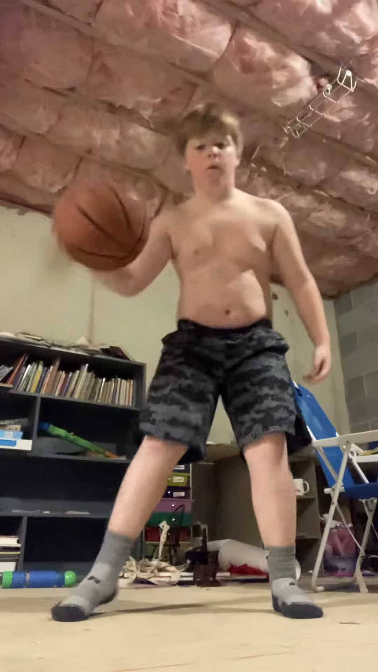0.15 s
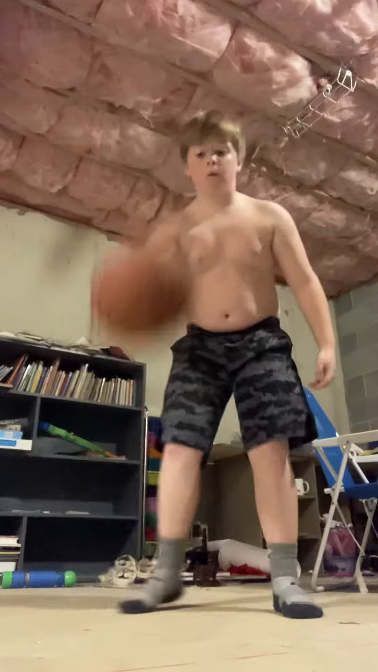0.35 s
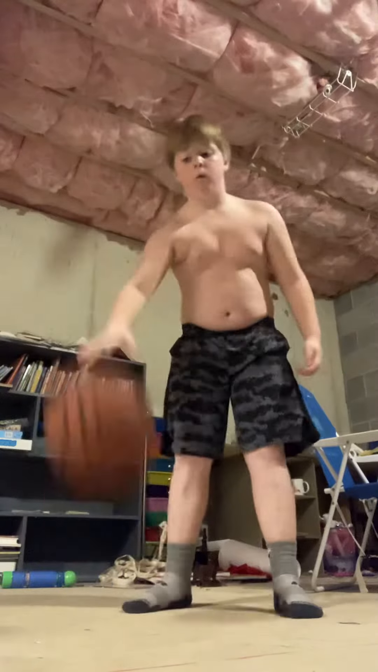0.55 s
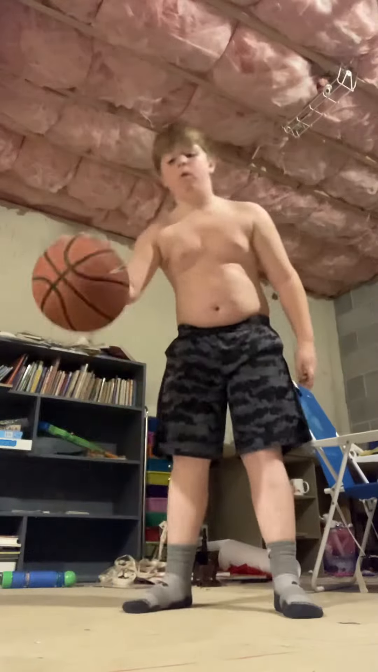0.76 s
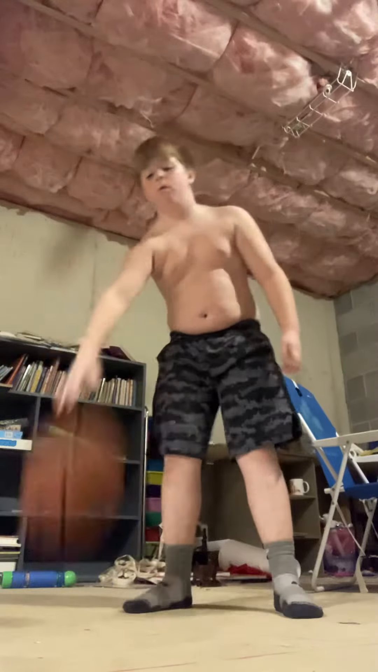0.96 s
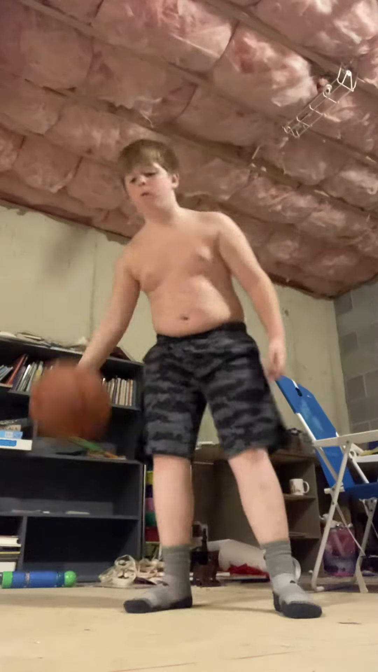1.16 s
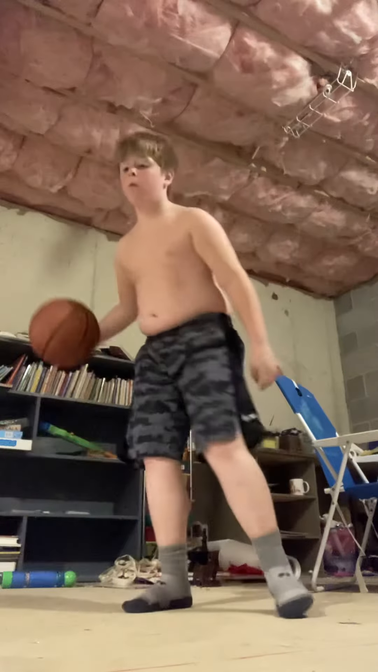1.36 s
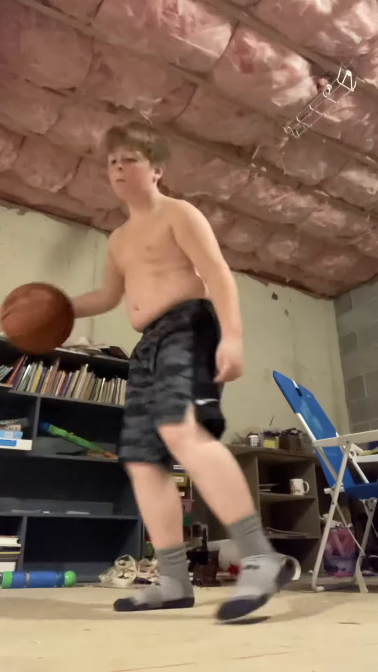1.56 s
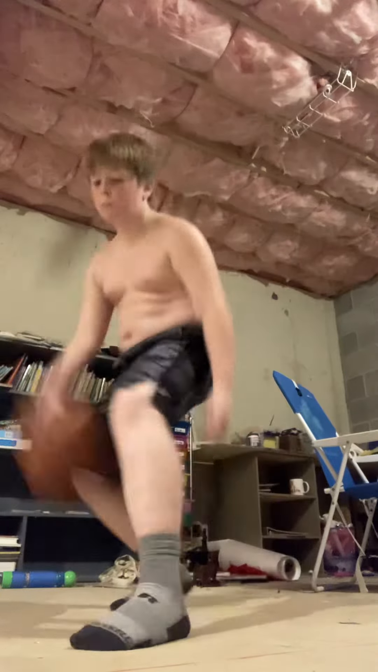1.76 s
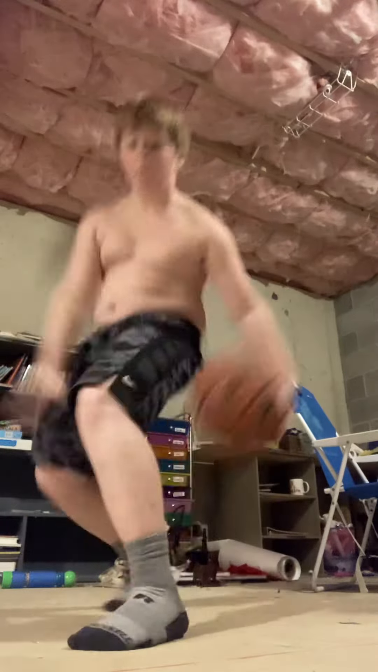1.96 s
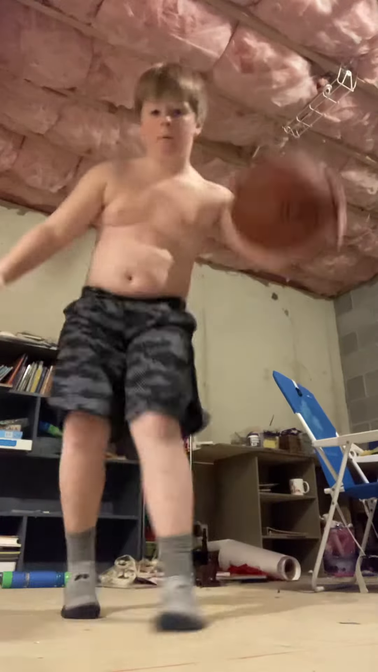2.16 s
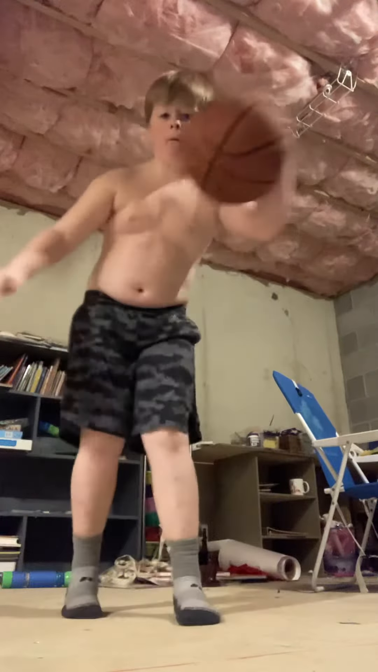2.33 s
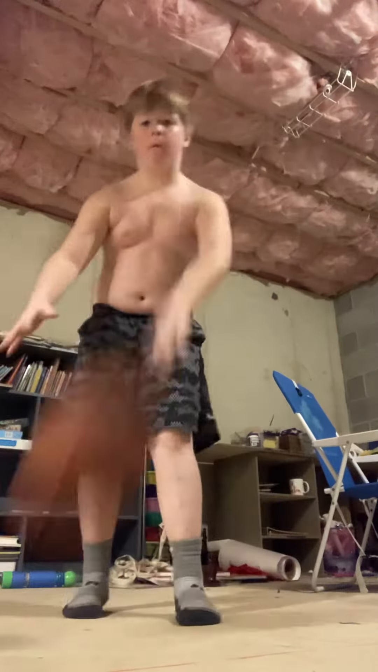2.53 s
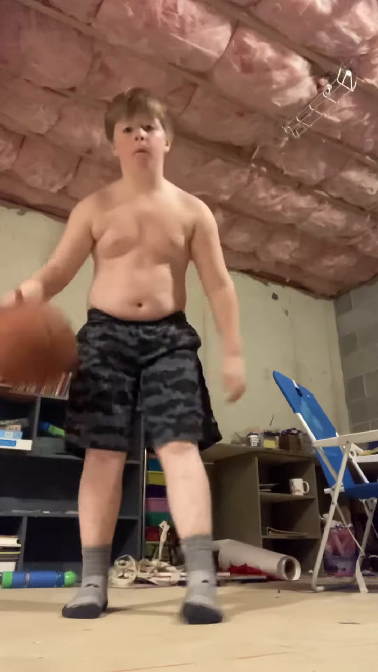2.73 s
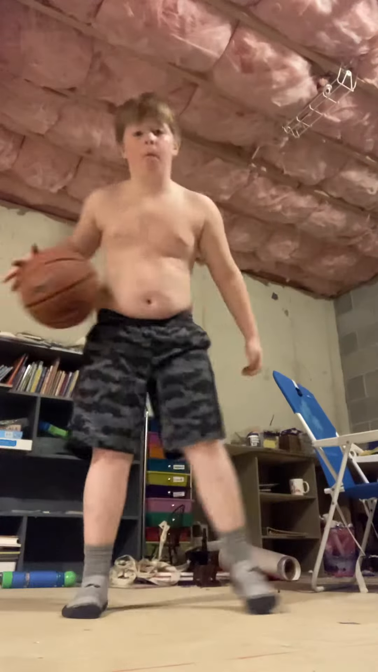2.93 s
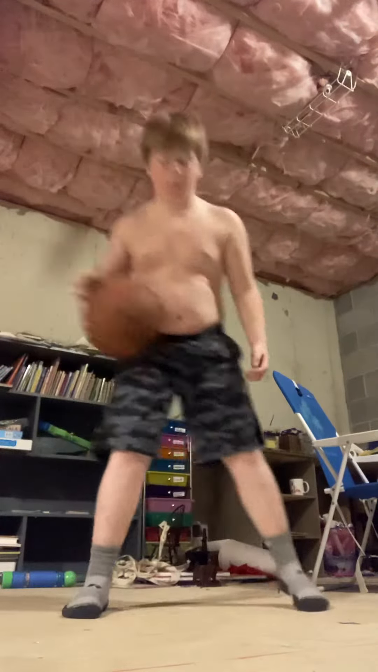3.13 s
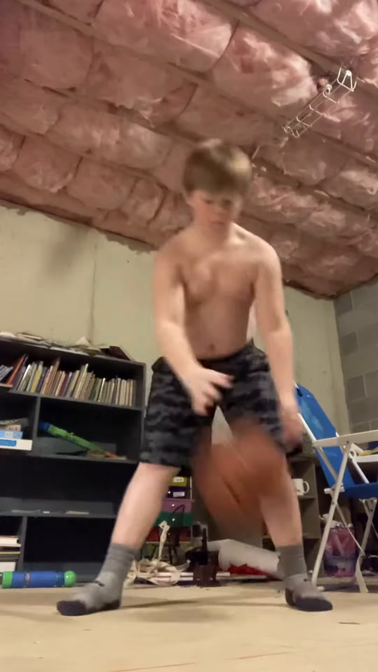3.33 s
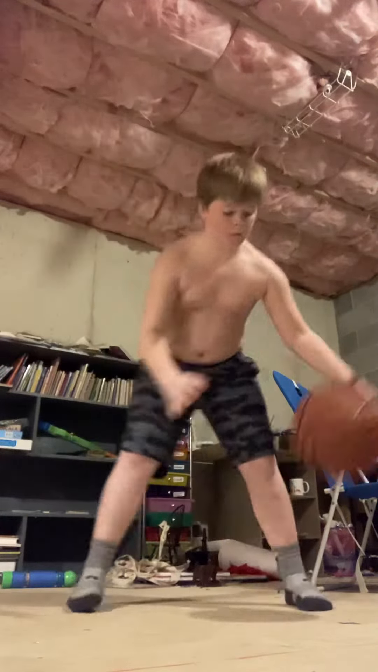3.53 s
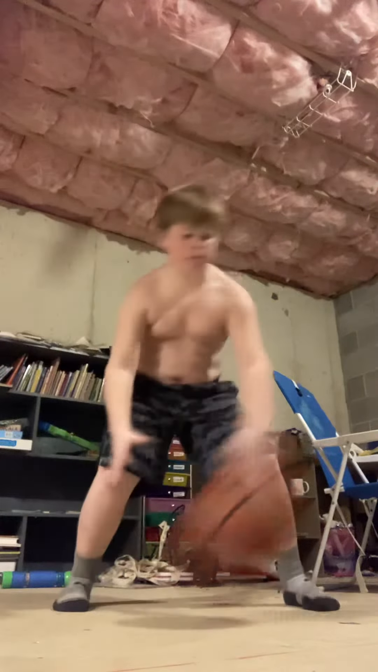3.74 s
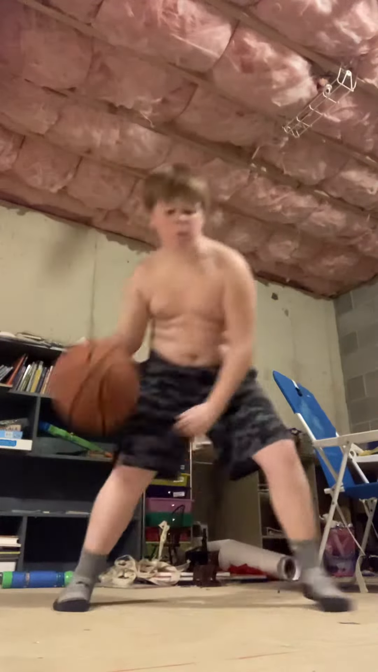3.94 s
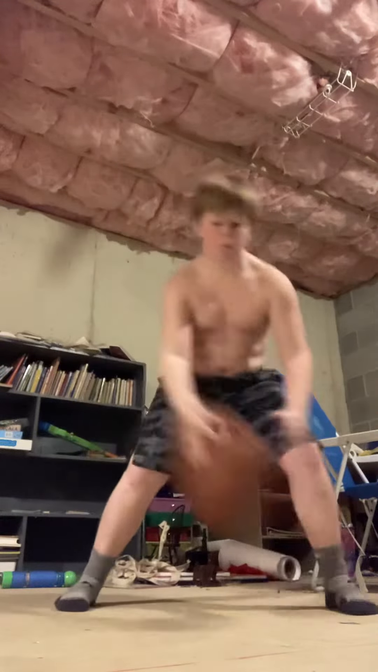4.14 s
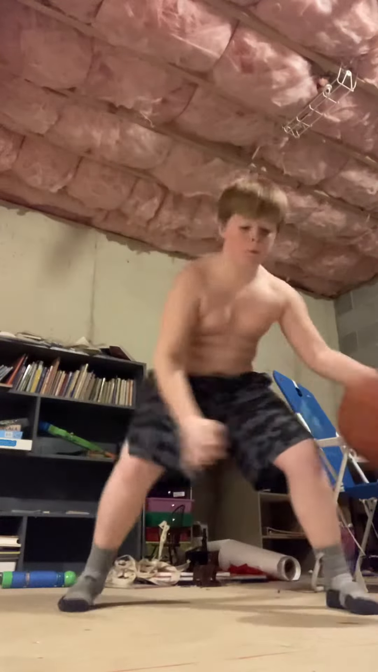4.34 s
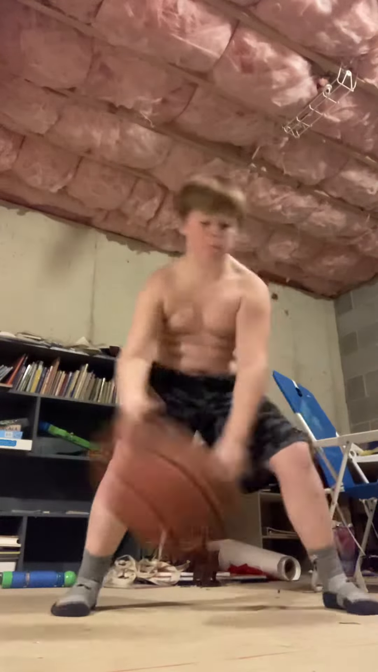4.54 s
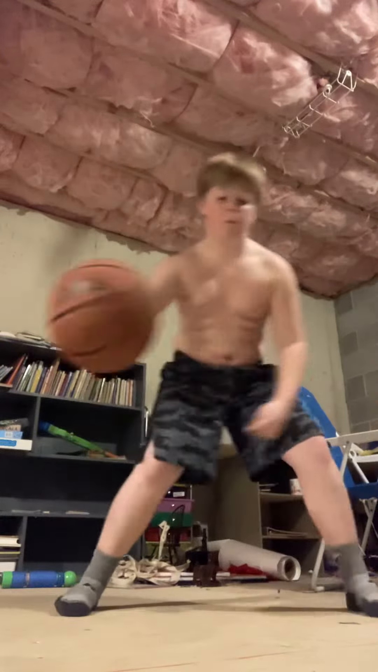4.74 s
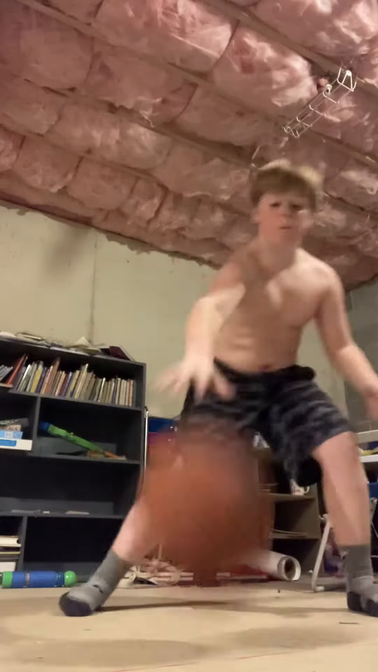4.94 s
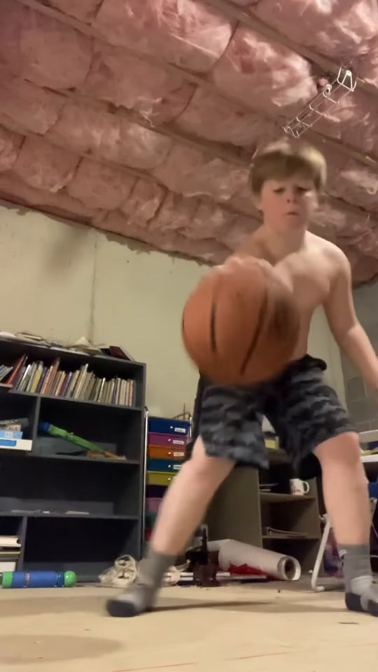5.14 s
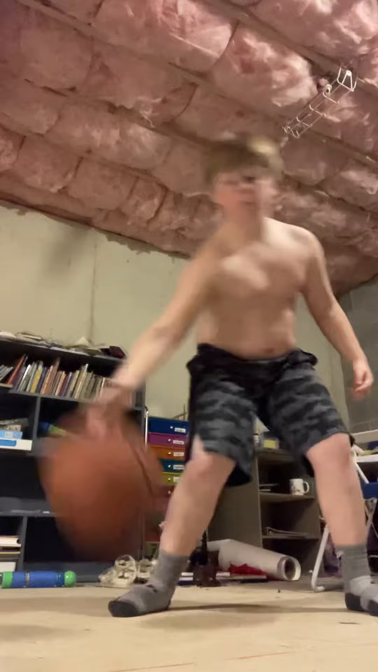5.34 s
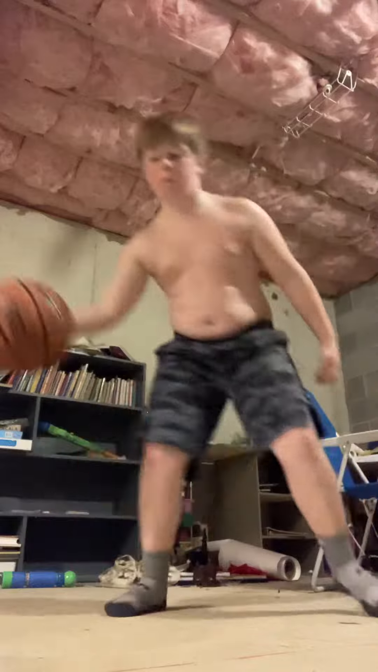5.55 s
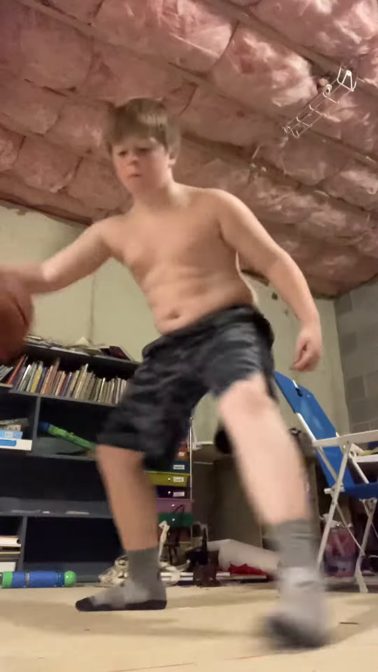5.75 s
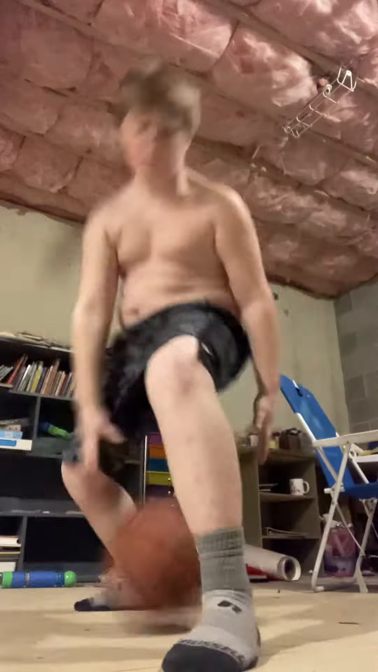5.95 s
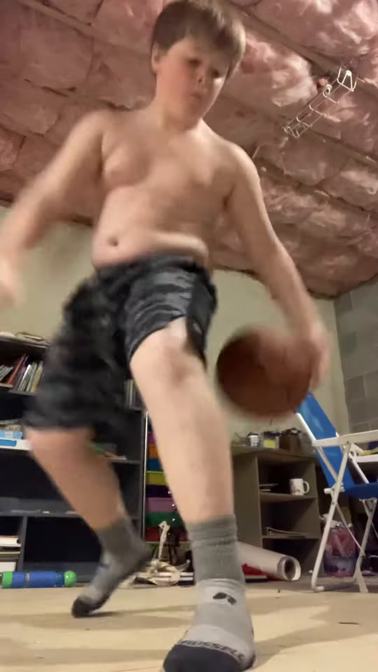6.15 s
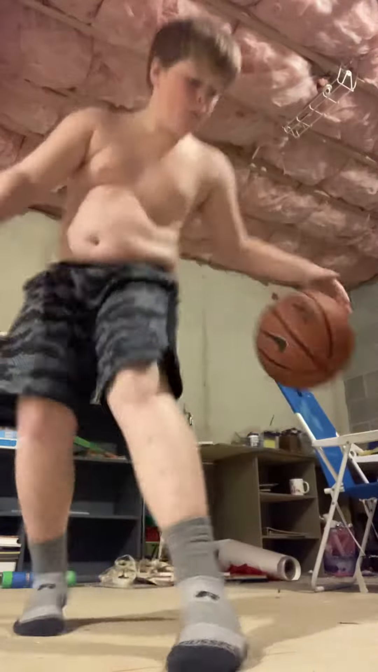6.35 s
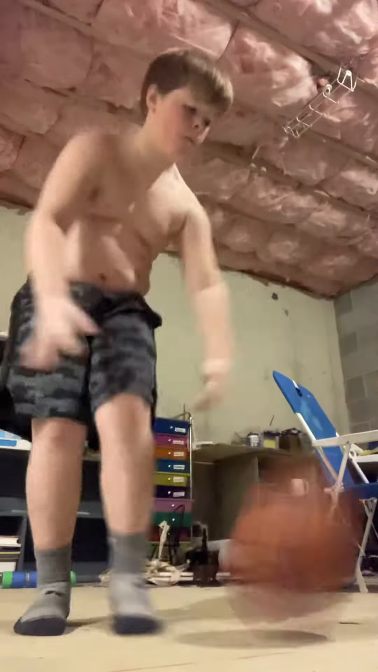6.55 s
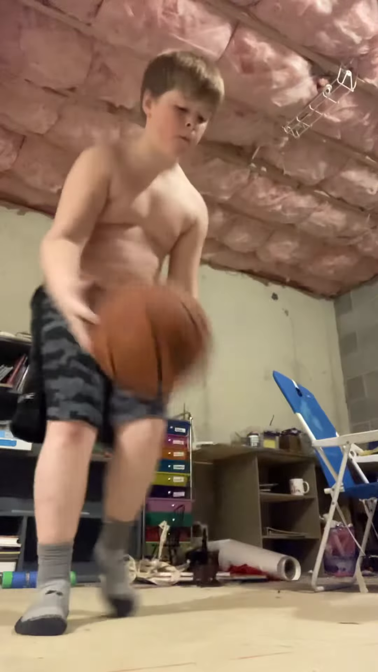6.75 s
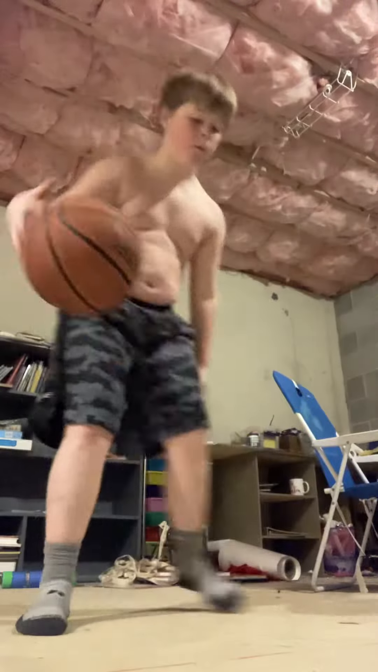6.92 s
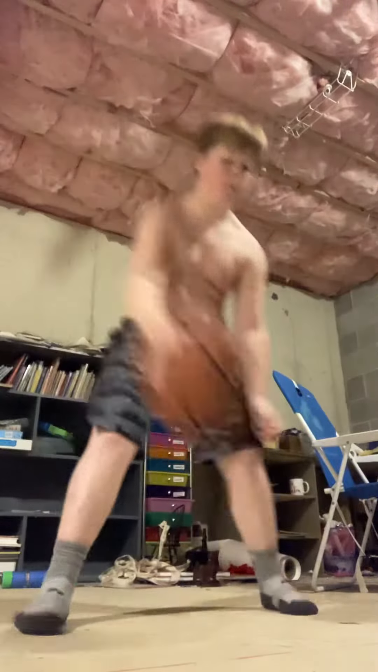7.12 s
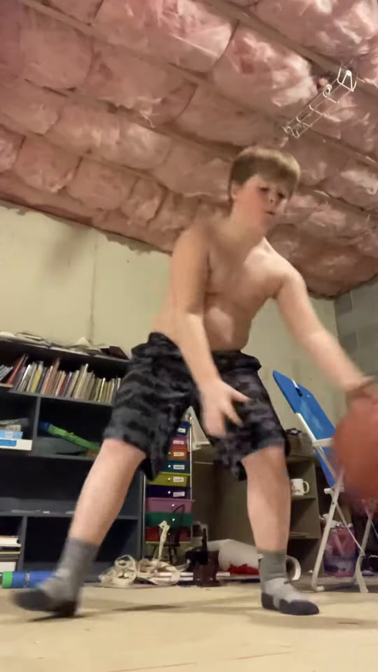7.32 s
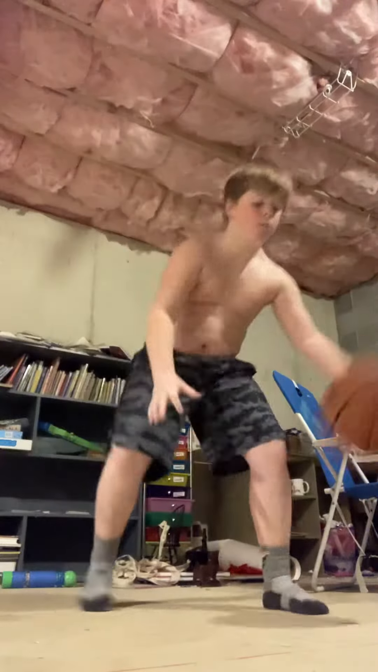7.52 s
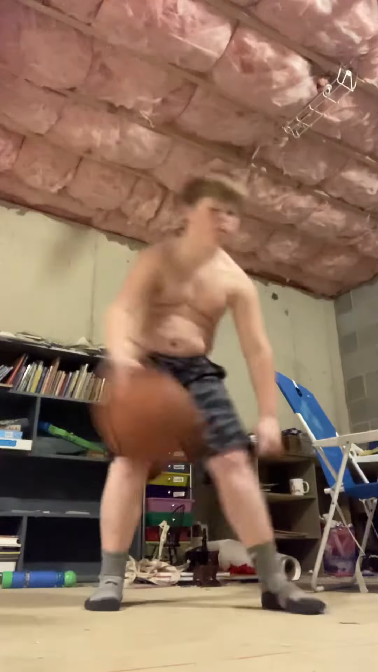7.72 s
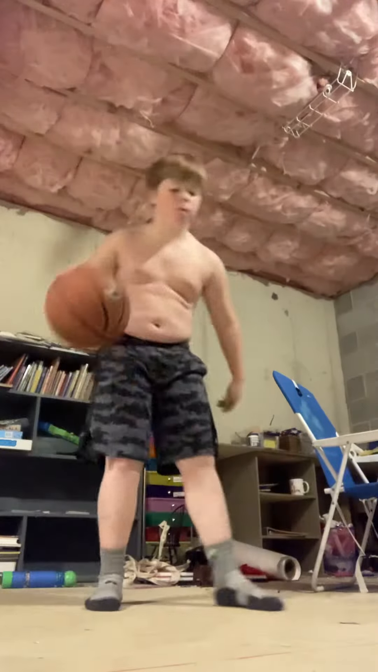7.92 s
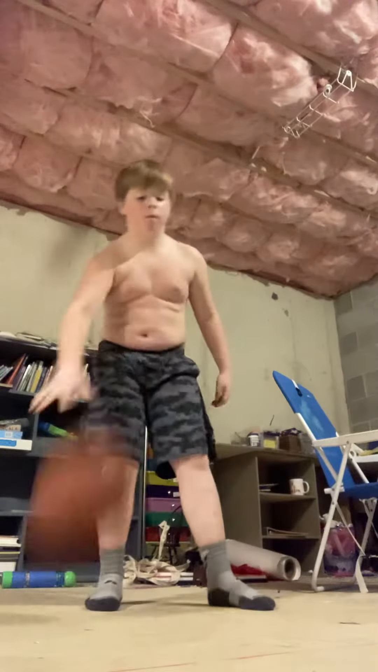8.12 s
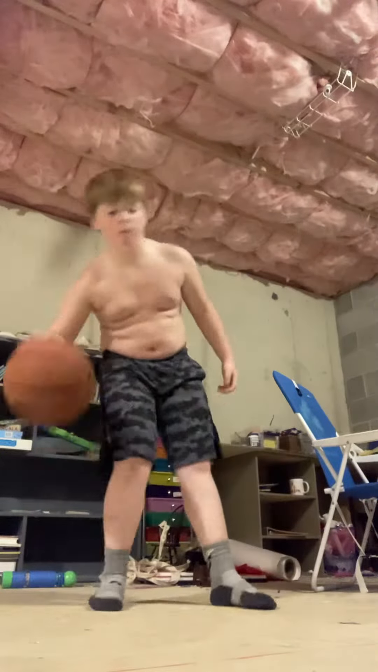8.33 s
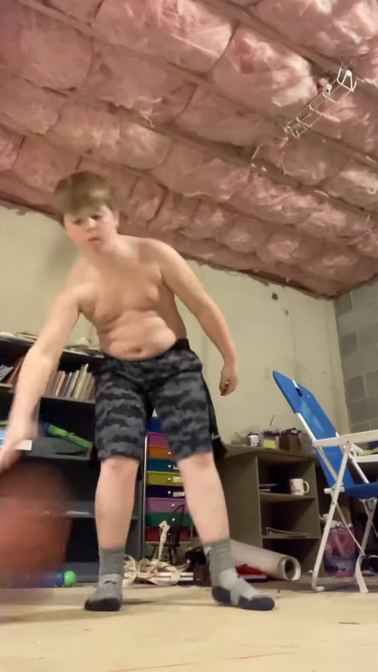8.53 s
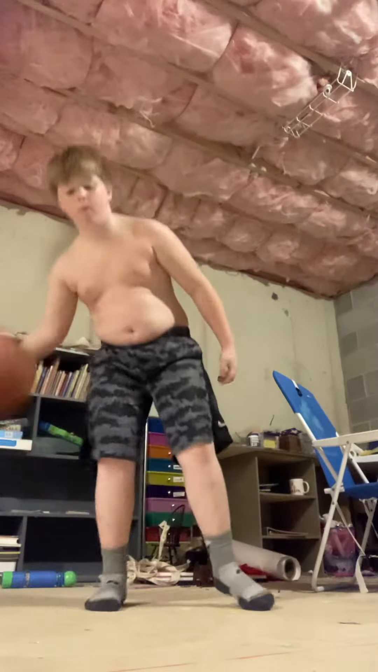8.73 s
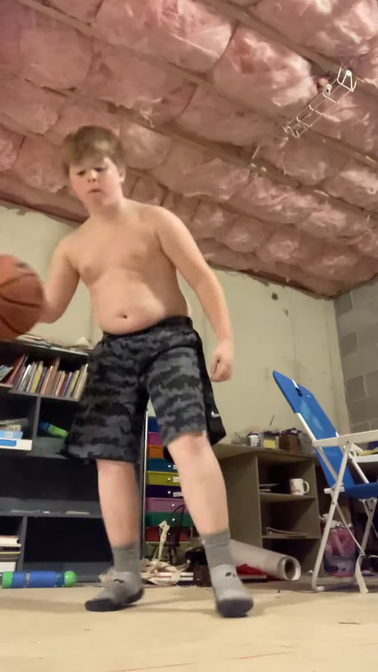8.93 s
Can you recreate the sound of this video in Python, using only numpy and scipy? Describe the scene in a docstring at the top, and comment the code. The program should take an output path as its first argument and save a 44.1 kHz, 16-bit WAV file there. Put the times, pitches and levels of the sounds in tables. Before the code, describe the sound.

In a quiet basement, a soft heel thud and faint sock swish lead into a basketball dribbled close to a low stereo microphone. Each bounce is a sharp slap over a deep falling thump, with a metallic hollow ping, a quick ceiling echo and a short room tail. The pace starts slow, tightens in the middle, then loosens. Light hand pats and cloth swishes fill the gaps.

```python
"""A faint room hush, a soft heel thud and the swish of a sock come first;
then a basketball is dribbled on a bare basement floor, close to two low microphone ports.
Each bounce sums a noisy slap, a thump of falling pitch, decaying modes of shell, floor and inner air,
a ceiling echo and a diffuse room tail. Pats, finger brushes and rubs of the hand are shaped noise,
cloth is friction noise, and heels are decaying modes."""
import sys
import numpy as np
from scipy import signal
from scipy.fft import rfft, irfft, next_fast_len
from scipy.io import wavfile
from scipy.ndimage import uniform_filter1d

SR = 44100
rng = np.random.default_rng(int(sys.argv[2]) if len(sys.argv) > 2 else 0)


def digitize_waveform(pressure):
    """Quantize a signal to 16-bit integers and store it at the path in sys.argv[1].

    Rows of a 2-D input are taken as channels; values are limited to [-1, 1].
    """
    field = np.atleast_2d(pressure).T
    bounded = np.clip(field, -1, 1)
    quanta = np.round(bounded * 32767).astype(np.int16)
    wavfile.write(sys.argv[1], SR, quanta)


N = 400428


def amp(db):
    """Decibel law: 20 dB is a tenfold gain in amplitude."""
    return 10 ** (np.asarray(db) / 20)


def unit_rms(x):
    """Power normalisation: scales a signal to rms 1."""
    return x / np.sqrt(np.mean(x ** 2) + 1e-20)


def smooth_noise(shape, sizes, axes=(-1, -1)):
    """Moving averages: two passes leave mainly the slow part of white noise, at rms 1."""
    noise = rng.standard_normal(shape)
    for size, axis in zip(sizes, axes):
        noise = uniform_filter1d(noise, size=size, axis=axis)
    return unit_rms(noise)


def read(points, hz):
    """Logarithmic frequency scale: interpolates a table between its points."""
    point_hz, value = np.transpose(points)
    return np.interp(np.log(hz + 1), np.log(point_hz + 1), value)


def add(mix, start_s, sound):
    """Superposition: lays a mono or stereo sound into the mix."""
    part = mix[:, round(start_s * SR):][:, :sound.shape[-1]]
    part += sound[..., :part.shape[1]]


def tilt(points, db, pivot_hz):
    """Spectral tilt: shifts the levels above the pivot by db."""
    return [(hz, level + db / (1 + (pivot_hz / hz) ** 3)) for hz, level in points]


def colour(x, points, size=2048):
    """Minimum-phase filtering: imposes a spectrum without sounding before its cause."""
    log_gain = np.log(amp(read(points, abs(np.fft.fftfreq(size, 1 / SR)))))
    taps = np.fft.ifft(np.exp(np.conj(signal.hilbert(log_gain)))).real
    return signal.oaconvolve(np.atleast_2d(x), taps[None, :size // 2], axes=1)[:, :x.shape[-1]]


def hump(t, peak_s, sharpness):
    """Gamma envelope: rises to 1 at peak_s, then dies."""
    return (t / peak_s * np.exp(1 - t / peak_s)) ** sharpness


def mode(t, hz, db, t60):
    """Damped resonance: one sinusoid that loses 60 dB in t60 seconds."""
    return amp(db) * np.exp(-np.log(1000) * t / t60) * np.sin(2 * np.pi * hz * t)


def ring(modes, t):
    """Modal superposition: each blow excites every mode a little differently."""
    return sum(mode(t, hz, db + 2 * rng.standard_normal(), t60) for hz, db, t60 in modes)


# likeness of the two ports for scattered sound: frequency_hz, likeness (0 to 1)
PORT_LIKENESS = [(100, .98), (400, .93), (1000, .8), (2400, .6), (3600, .25), (5000, .35), (9000, .6),
                 (14000, .5)]


def scatter(points, count):
    """Partial coherence: coloured noise of rms 1, whose likeness at the ports varies with frequency."""
    hz = np.fft.rfftfreq(count, 1 / SR)
    a, b = np.exp(2j * np.pi * rng.random((2, len(hz))))  # random phases
    same = np.clip(read(PORT_LIKENESS, hz), 0, 1)
    ports = np.array([a, same * a + np.sqrt(1 - same ** 2) * b])
    return unit_rms(irfft(ports * amp(read(points, hz)), count))


# decay of the room: frequency_hz, t60_s
ROOM_DECAY = [(60, 0.72), (130, 0.29), (350, 0.34), (900, 0.32), (2400, 0.27), (5000, 0.28), (12000, 0.24)]


def tail(points, count=32768, patchy_db=2.5):
    """Diffuse reverberation: uneven clumps of echoes, each band dying at its own speed."""
    hz, t, z = signal.stft(scatter(points, count), SR, nperseg=512)
    clumps = smooth_noise(z.shape[1:], (5, 3), axes=(0, 1))
    fall_db = -60 * t / read(ROOM_DECAY, hz)[:, None]
    return signal.istft(z * amp(fall_db + patchy_db * clumps), SR, nperseg=512)[1][:, :count]


def smack(t, points, grit, decay_s, count=220):
    """Impulsive contact: a click and a quick crush of noise, of rms 1 over its first 5 ms."""
    drive = grit * rng.standard_normal(len(t)) * np.exp(-t / decay_s)
    drive[0] -= 1
    sound = colour(drive, points)[0]
    return sound / np.sqrt(np.mean(sound[:count] ** 2))


# spectrum of the quiet room: frequency_hz, level_db (relative)
HUSH_COLOUR = [(25, -16), (56, -4), (111, 0.5), (301, -8), (901, -18.5), (2210, -14.5), (3310, -15.5),
               (9510, -29), (16000, -43)]
HUSH_DB = -70


def hush():
    """Stationary noise: the steady hush of the room."""
    return amp(HUSH_DB) * scatter(HUSH_COLOUR, next_fast_len(N))[:, :N]


# a heel lands: start_s, level_db (added to the mode levels)
STEP_EVENTS = [(0.058, -34), (0.747, -35), (0.792, -37.5), (2.485, -29), (2.514, -37), (6.249, -51)]
# a heel on the floor: frequency_hz, level_db (varied at each step), t60_s
HEEL_MODES = [(58, -8.5, 0.5), (82, -3.5, 0.2), (112, -7.5, 0.13), (164, -2.5, 0.059), (318, -32.5, 0.45)]


def steps(rise_s=0.014):
    """Soft impact: a heel in a sock eases low floor modes into motion."""
    out, t = np.zeros((2, N)), np.arange(16384) / SR
    for start_s, db in STEP_EVENTS:
        add(out, start_s, amp(db) * ring(HEEL_MODES, t) * (1 - np.exp(-(t / rise_s) ** 2)))
    return out


# spectrum of rubbing cloth before tilt: frequency_hz, level_db (relative)
CLOTH_COLOUR = [(151, -21.5), (520, -4.5), (920, -0.5), (1420, 6), (2150, 7), (2750, 2), (4520, 0),
                (6520, -5), (9020, 0.5), (13500, -12), (15200, -6), (16200, -24.5)]


def cloth(bright_db, count, grain=0.2):
    """Dry friction: a hiss made uneven by the changing pressure on the fibres."""
    fibres = 1 + grain * smooth_noise(count, (500, 300))
    return scatter(tilt(CLOTH_COLOUR, bright_db, 3100), count) * fibres / np.sqrt(1 + grain ** 2)


# a sock or a leg of the shorts slides: middle_s, length_s, level_db, brightness_db
SWISH_EVENTS = [(0.158, .03, -63.5, 9), (0.332, 0.082, -53, 2), (1.389, .09, -64, 15),
                (1.554, 0.1, -50, -4), (1.752, 0.047, -44, 2), (2.025, 0.084, -45.5, 1),
                (2.132, 0.098, -43, -1), (2.193, 0.078, -41, -1), (3.268, 0.059, -58.5, 3),
                (3.355, 0.082, -48.5, 3.5), (3.48, 0.12, -91.5, 5), (3.663, 0.043, -57.5, 4),
                (3.985, 0.059, -49.5, -2.5), (4.417, 0.086, -45, 0.5), (4.698, 0.08, -53.5, -3),
                (5.114, 0.16, -52.5, 4), (5.616, 0.088, -50, -4), (5.749, 0.047, -50.5, 11.5),
                (5.814, 0.052, -44, 8), (6.112, 0.055, -50, 7), (6.297, 0.052, -46.5, 6.5),
                (6.488, 0.13, -43, 0), (6.65, .08, -53, 17.5), (6.96, 0.059, -61, -12),
                (7.036, 0.054, -57, 12.5), (7.15, 0.14, -58.5, -5), (7.29, 0.1, -57, 7),
                (7.494, 0.12, -54.5, -3), (7.829, 0.18, -54.5, -3), (8.858, 0.11, -60.5, 18),
                (9.045, 0.071, -54, 3)]


def swishes(count=32768):
    """Sliding friction: cloth noise swells and fades with each stroke, at its own brightness."""
    out = np.zeros((2, N))
    t = (np.arange(count) - count // 2) / SR  # zero at mid-stroke
    for middle_s, length_s, db, bright_db in SWISH_EVENTS:
        hiss = cloth(bright_db, count)
        stroke = 1 / np.sqrt(1 + abs(2 * t / length_s) ** 6.1)
        start_s = middle_s + t[0]
        early = max(0, -round(start_s * SR))  # samples that fall before the scene begins
        add(out, max(0, start_s), (amp(db) * hiss * stroke)[:, early:])
    return out


# the fingers let go about this long before each bounce
RELEASE_S, RELEASE_SPREAD_S, RELEASE_RISE_S = 0.078, 0.016, .02
RELEASE_DB, RELEASE_BRIGHT_DB = -60, 10.5


def releases():
    """Brushing friction: fingertips leave the ball on its way down to each bounce."""
    out, t = np.zeros((2, N)), np.arange(8192) / SR
    for (bounce_s, *_), late in zip(BOUNCE_EVENTS, rng.uniform(-1, 1, len(BOUNCE_EVENTS))):
        brush = scatter(tilt(HAND_COLOUR, RELEASE_BRIGHT_DB, 880), len(t)) * hump(t, RELEASE_RISE_S, 0.51)
        add(out, bounce_s - RELEASE_S + RELEASE_SPREAD_S * late, amp(RELEASE_DB) * brush)
    return out


def thump(t, boom_db, knock_db, low_hz=92, sweep_hz=480, sweep_s=.0042):
    """Dispersive bending waves: the floor carries the high part of the blow fastest, so a knock slides into a
    boom."""
    turns = low_hz * t + sweep_hz * sweep_s * (1 - np.exp(-t / sweep_s))  # integral of the falling pitch
    knock, boom = hump(t, .0047, 5), hump(t, .014, 4.4)
    return (amp(knock_db) * knock + amp(boom_db) * boom) * np.sin(2 * np.pi * turns)


# the air inside the ball: frequency_hz, level_db (varied at each bounce), t60_s
CAVITY_MODES = [(1054, -39, .38), (1265, -37, .38), (2410, -50, .35), (2915, -51, .35), (3048, -54, 1.2),
                (3475, -49, .4), (3730, -50, .6), (3960, -54, .65), (4030, -52, .35), (4397, -50, .48),
                (4722, -53, .62), (5080, -56, .42), (5420, -56, .42), (6300, -60, .4)]
# spin swings each mode toward and away from the ports: depth and fastest rate
SWING, MAX_SWING_HZ = .3, 5
SPIN_SPLIT_HZ, SPLIT_AT_HZ = 1.5, 3000  # mean shift of each partner, for a mode at SPLIT_AT_HZ


def pings(t, partner_db=-3):
    """Mode splitting: spin parts each air mode into a beating pair, the higher modes more widely."""
    out = np.zeros(len(t))
    for hz, db, t60 in CAVITY_MODES:
        db = db + 1.5 * rng.standard_normal()
        split = SPIN_SPLIT_HZ * (hz / SPLIT_AT_HZ) ** 2 * rng.uniform(.4, 1.6)
        swing_hz = MAX_SWING_HZ * rng.uniform(.5, 1)
        swing = 1 + SWING * np.sin(2 * np.pi * (swing_hz * t + rng.random()))
        pair = mode(t, hz + split, db, t60) - mode(t, hz - split, db + partner_db, t60)
        out += swing * pair
    return out


# the ball hits the floor; levels are relative within each layer: start_s, boom_db, knock_db,
# board_db, hollow_db, crispness_db, shell_hz, ping_db
BOUNCE_EVENTS = [(0.4648, -9, -5.5, -31.5, -26, -1, 1460, 9),
                 (0.9922, -8.5, -13.5, -20.5, -36.5, -1.5, 1290, -4.5),
                 (1.851, -7.5, -4.5, -8.5, -20, -2, 1171, -1.5),
                 (2.5915, -8.5, -5.5, -19, -19.5, -2, 1164, 1), (3.3991, -11, -33, -14, -29, -1, 1653, 2),
                 (3.765, -9.5, -7, -10, -44, -0.5, 1005, 6.5), (4.19, -8, -6.5, 0, -19.5, -1.5, 1075, 0.5),
                 (4.49, -9.5, -3, 1, -18, -0.5, 968, -0.5), (4.9105, -9.5, -5.5, -35, -21.5, -1, 1033, 4),
                 (5.291, -11.5, -7, -4.5, -22.5, 1, 1250, 1.5),
                 (5.9396, -9, -8, 2.5, -13.5, -1.5, 1337, 4.5),
                 (6.5504, -12.5, -5.5, -14, -16, -1, 1255, 3),
                 (7.2136, -11.5, -5, -10.5, -20.5, -1.5, 1580, 0.5),
                 (7.5967, -11, -5, -32, -23.5, -1.5, 1377, -1),
                 (8.1905, -9, -10.5, -22, -25.5, -1, 1350, 5.5), (8.572, -10.5, -7.5, -28, -24, 0, 1022, 4)]
# spectra of the slap, its treble tick, the ceiling's return and the room: frequency_hz, level_db (relative)
SLAP_COLOUR = [(150, 2.5), (410, -1.5), (610, -0.5), (790, -4.5), (1010, 0.5), (1510, 1), (2110, -0.5),
               (2450, -2.5), (2850, -8.5), (3450, -0.5), (4050, -9), (5800, -12), (7000, -28.5),
               (16000, -38.5)]
TICK_COLOUR = [(800, -25), (3010, 2), (3700, 3.5), (4400, -0.5), (5600, 3.5), (8510, 6), (13000, -2.5),
               (16000, -10.5)]
CEILING_COLOUR = [(201, -12), (500, 5), (800, 1.5), (1250, 9), (2520, -1.5), (3700, 3), (4520, -1.5),
                  (7020, -25), (9400, -8), (15000, -22.5)]
TAIL_COLOUR = [(50, -16.5), (101, 3), (171, 7), (271, 10.5), (391, -1.5), (491, -1.5), (651, -3.5),
               (851, -10.5), (1110, -3), (1510, -2.5), (2510, -6.5), (4510, -7.5), (7010, -21),
               (14000, -30)]
# standing waves between floor and walls: frequency_hz, level_db (relative to the boom), t60_s
STANDING_MODES = [(52.9, -26.5, .5), (89, -13.5, 0.22), (107.7, -17, 0.31), (168.75, -23, 0.4),
                  (242, -31.5, 0.42)]
SLAP_DB, TICK_DB, SHELL_DB = -11.5, -27, -10.5  # slap and shell at crispness 0 dB, tick at the plain boom
SHELL_GROWTH, ROOM_GROWTH = 1.9, 0.75  # dB of shell note; dB of echo and room treble, per dB of crispness
PLAIN_BOOM_DB, TICK_GROWTH = -9.5, -0.5  # a deeper squash dulls the tick: dB per dB of boom
BOARD_HZ, BOARD_SPREAD, BOARD_RISE_S = 266.3, 0.11, 0.023  # the floor's note shifts with the spot hit
BOARD_T60, SHELL_T60, JOIST_S = .1, .045, .003  # seconds; joists smear the ceiling echo
CEILING_M, CEILING_SPREAD, SOUND_M_PER_S = 2.08, .04, 343  # mean height, spread as a fraction
THUMP_ROOM_DB, SHELL_ROOM_DB = -31.5, -17.5  # how much of each the room throws back


def bounces(ceiling_db=-21.0, tail_db=-19.5, standing_db=5.0, ping_db=-6.0):
    """Impact and reverberation: slap, thump and resonances, then the ceiling's echo and the room."""
    out, t = np.zeros((2, N)), np.arange(32768) / SR
    brief = t[:4096]
    spots = rng.uniform(-1, 1, (len(BOUNCE_EVENTS), 2))
    for event, (across, along) in zip(BOUNCE_EVENTS, spots):
        start_s, boom_db, knock_db, board_db, hollow_db, crisp_db, shell_hz, ring_db = event
        # thump, floor board and hollow ring are a little louder at the left port
        board = mode(t, BOARD_HZ * (1 + BOARD_SPREAD * across), board_db, BOARD_T60)
        board = board * (1 - np.exp(-t / BOARD_RISE_S))
        add(out, start_s, (thump(t, boom_db, knock_db) + board) * amp([[.9], [-1.2]]))
        add(out, start_s, mode(t, 484, hollow_db, 0.12) * amp([[2.2], [-2.2]]))
        # the slap of the pebbled skin and its treble tick
        slap = smack(brief, SLAP_COLOUR, grit=0.31, decay_s=0.0038)
        add(out, start_s, amp(SLAP_DB + crisp_db) * slap)
        tick = smack(brief, TICK_COLOUR, grit=.06, decay_s=0.0049)
        add(out, start_s, amp(TICK_DB + TICK_GROWTH * (boom_db - PLAIN_BOOM_DB)) * tick)
        # the shell's brief note depends on the spot that lands
        shell = mode(brief, shell_hz, SHELL_DB + SHELL_GROWTH * crisp_db, SHELL_T60)
        add(out, start_s, shell)
        # the ring reaches the two ports with a small fixed time offset
        ping = amp(ping_db + ring_db) * pings(t)
        add(out, start_s, np.array([ping[:-5], ping[5:]]) * signal.windows.tukey(len(t) - 5, .01))
        # one sharp return from overhead, frayed by the joists
        echo = np.array([smack(brief, CEILING_COLOUR, grit=0.25, decay_s=JOIST_S) for _ in range(2)])
        echo_s = 2 * CEILING_M * (1 + CEILING_SPREAD * along) / SOUND_M_PER_S
        echo_gain = amp(ceiling_db + ROOM_GROWTH * crisp_db)
        add(out, start_s + echo_s, echo_gain * (echo + 0.83 * echo[::-1]))
        # the room takes a moment to fill
        swell = 1 - np.exp(-(t / 0.0083) ** 2)
        room = tail(tilt(TAIL_COLOUR, ROOM_GROWTH * crisp_db, 900)) * swell
        add(out, start_s, amp(tail_db) * room)
        # the thump and the shell's note linger in the room
        sent = amp(THUMP_ROOM_DB) * thump(brief, boom_db, knock_db) + amp(SHELL_ROOM_DB) * shell
        walls = tail(TAIL_COLOUR) * swell
        add(out, start_s, signal.fftconvolve(walls / np.linalg.norm(walls[0]), sent[None], axes=1))
        add(out, start_s, amp(boom_db + standing_db) * ring(STANDING_MODES, t) * swell)
    return out


# the hand meets the ball: start_s, level_db (relative), brightness_db (low for palm, high for fingers)
PAT_EVENTS = [(0.596, -31.5, -3.5), (0.902, -56.5, 17), (1.1444, -42.5, 8), (1.801, -46.5, 21),
              (2.7333, -35, 10.5), (3.556, -36.5, 10.5), (3.729, -44, 19), (3.873, -39.5, -6),
              (4.135, -51, 14.5), (4.579, -25.5, 0), (5.025, -36, -12), (6.4132, -35, -8.5),
              (6.724, -47.5, 2), (7.538, -51, 22.5), (8.3084, -30.5, -5), (8.699, -49, 8)]
# spectrum of the hand on the ball before tilt: frequency_hz, level_db (relative)
HAND_COLOUR = [(60, -13.5), (131, -2), (251, -9.5), (481, 0.5), (710, -15), (1010, -17), (2010, -24),
               (5010, -39), (15000, -61)]


def pats(room_db=-14, clap_db=1):
    """Damped contact: a hand claps onto the moving ball and settles, with the room behind it."""
    out, t = np.zeros((2, N)), np.arange(4096) / SR
    for start_s, db, bright_db in PAT_EVENTS:
        touch = tilt(HAND_COLOUR, bright_db, 880)
        add(out, start_s, amp(db + clap_db) * smack(t, touch, grit=0.48, decay_s=0.0045))
        add(out, start_s, amp(db - 7) * scatter(touch, len(t)) * hump(t, 0.0082, 0.75))
        add(out, start_s, amp(db + room_db) * tail(touch))
    return out


# the ball turns in the palm: start_s, level_db (noise rms before its envelope)
RUB_EVENTS = [(2.451, -59), (6.911, -57.5), (7.96, -60.5)]


def rubs(peak_s=0.032):
    """Skin friction: the palm drags briefly over the ball with a dull murmur."""
    out, t = np.zeros((2, N)), np.arange(12000) / SR
    # frequency_hz, level_db (relative)
    murmur = [(100, -13.5), (380, 2.5), (520, -8.0), (800, -19.0), (4000, -24.5), (15000, -65)]
    for start_s, db in RUB_EVENTS:
        add(out, start_s, amp(db) * scatter(murmur, len(t)) * hump(t, peak_s, 0.39))
    return out


# mean level as the legs keep moving in the shorts, far below the hush at first: time_s, level_db
RUSTLE_LEVEL = [(0, -84.5), (3.15, -88), (3.45, -58), (7.9, -65.5), (8.05, -71.5), (8.7, -61.5),
                (9.08, -64.5)]
RUSTLE_BRIGHT_DB, RUSTLE_UNEVEN_DB = -6, 2.2  # treble tilt; rms drift about the mean level


def rustle():
    """Continuous friction: the same cloth rubs on quietly and unevenly, rising after three seconds."""
    drift = smooth_noise(N, (3000, 2000))
    db = np.interp(np.arange(N) / SR, *np.transpose(RUSTLE_LEVEL)) + RUSTLE_UNEVEN_DB * drift
    return amp(db) * cloth(RUSTLE_BRIGHT_DB, next_fast_len(N))[:, :N]


def scene():
    """Superposition: hush, feet, clothes, ball and hands sound together."""
    return hush() + steps() + swishes() + releases() + bounces() + pats() + rubs() + rustle()


# the right port against the left: frequency_hz, level_db
RIGHT_PORT_GAIN = [(100, 0), (600, -0.5), (1300, -2), (2400, 3), (4400, -1.5), (9000, -0.5)]
# the left port hears first, by a lag that varies with frequency: frequency_hz, lag_s
RIGHT_PORT_LAG = [(300, 0.000095), (1800, 0.00013), (2900, 0.00017), (5500, 0.00012), (11400, .000132)]
EDGE_HZ = 16300  # upper band limit


def record(dry):
    """Diffraction and saturation: a lag and level between the ports, soft overload and a band limit."""
    hz = np.fft.rfftfreq(N, 1 / SR)
    delay = np.exp(-2j * np.pi * hz * read(RIGHT_PORT_LAG, hz))
    right = irfft(rfft(dry[1]) * amp(read(RIGHT_PORT_GAIN, hz)) * delay, N)
    ports = np.array([dry[0], right])
    held = ports / (1 + abs(ports) ** 6) ** (1 / 6)
    low_pass = signal.firwin(255, EDGE_HZ, window=("kaiser", 9), fs=SR)
    return signal.oaconvolve(held, low_pass[None], "same")


dry = scene()
out = record(dry)
digitize_waveform(out)
```